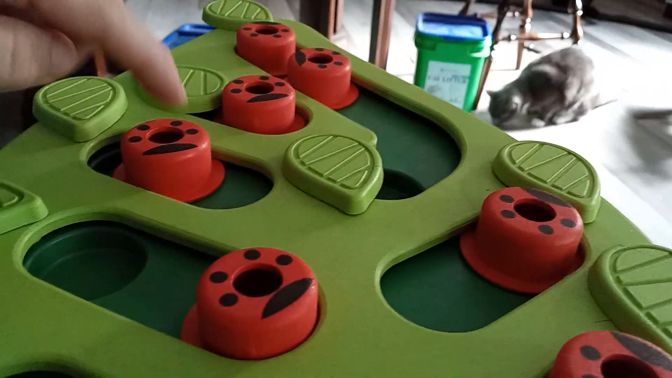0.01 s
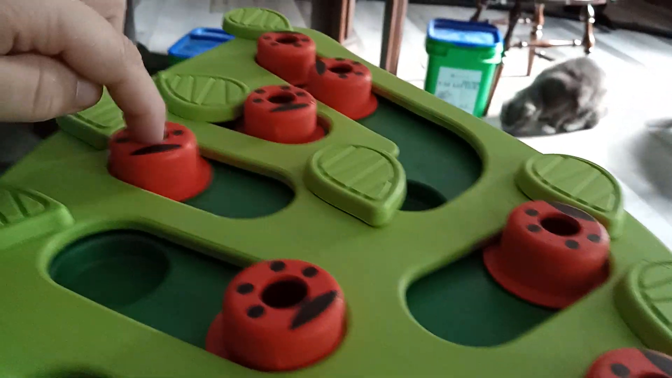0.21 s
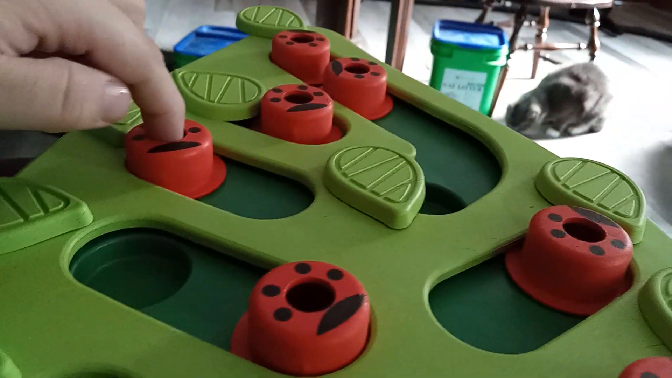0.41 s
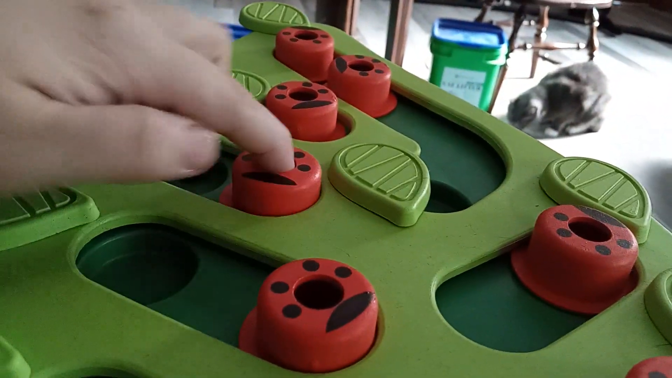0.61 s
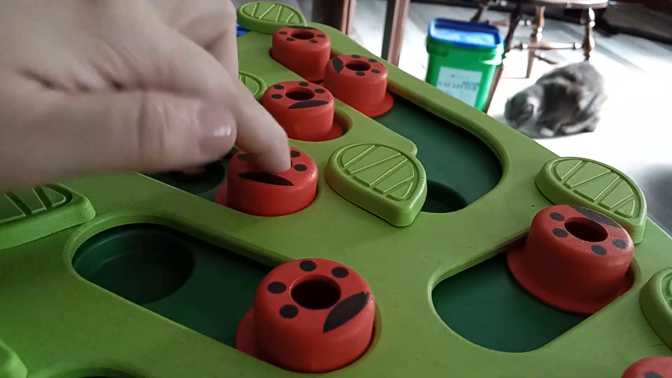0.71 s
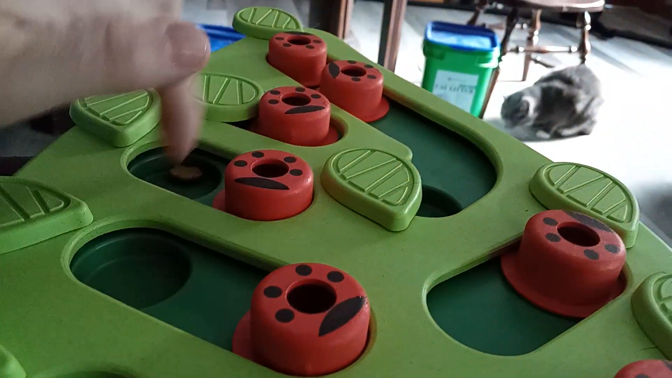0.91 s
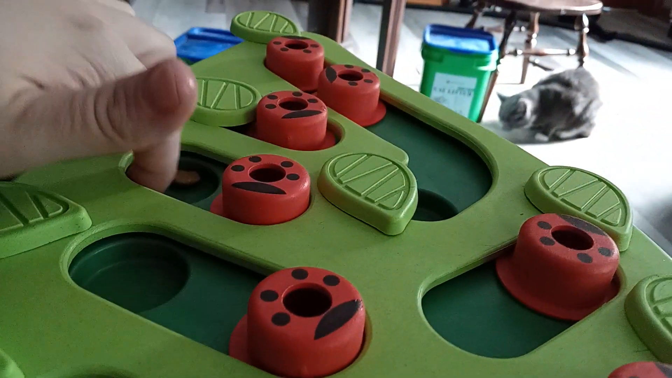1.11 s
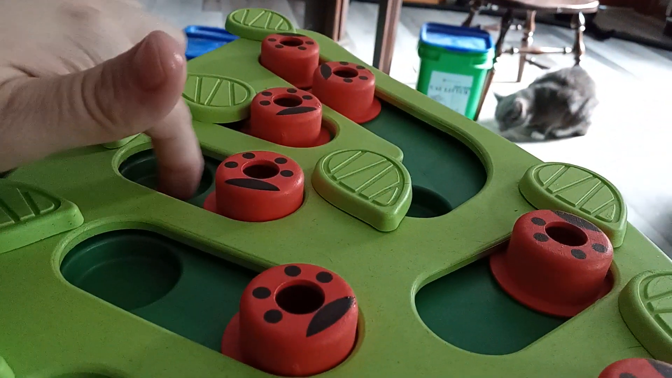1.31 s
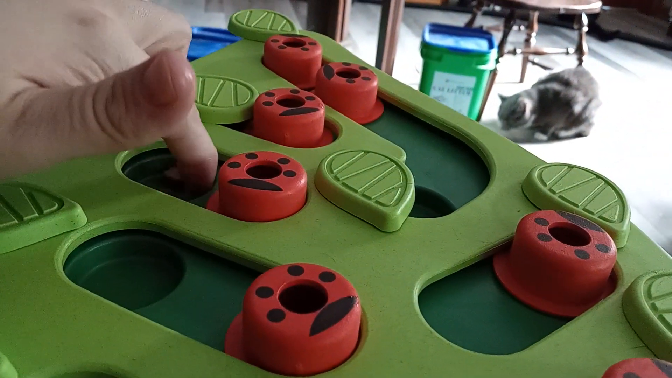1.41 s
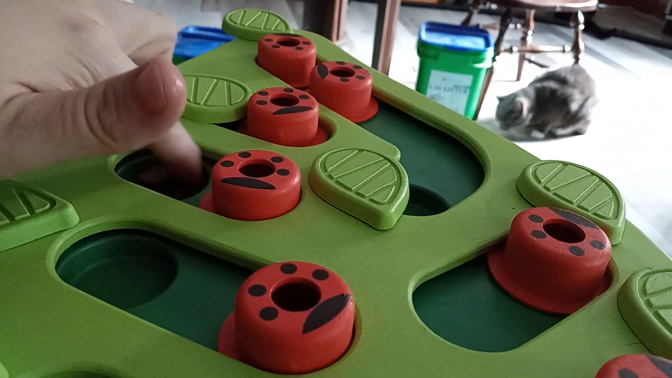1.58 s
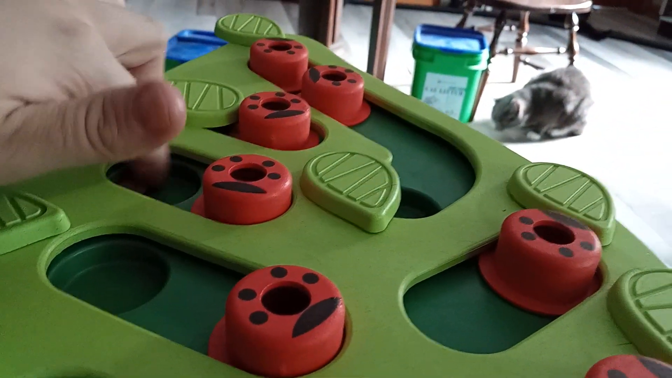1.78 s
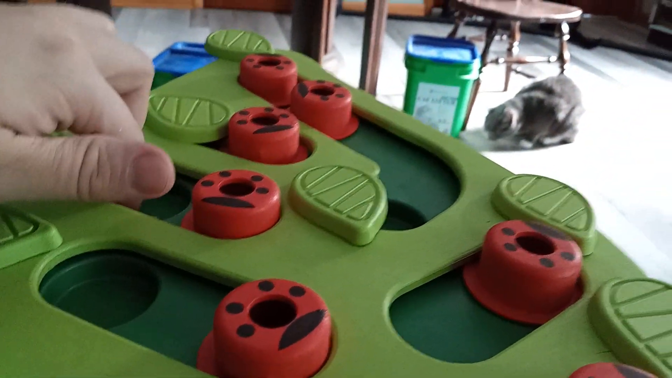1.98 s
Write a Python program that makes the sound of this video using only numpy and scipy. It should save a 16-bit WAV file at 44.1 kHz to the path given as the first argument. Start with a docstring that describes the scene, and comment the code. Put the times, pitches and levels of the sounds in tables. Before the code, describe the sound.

Close up and left of centre, two quick rattling plastic scrapes end in sharp hollow clacks and a brief rattle, followed by a light fingertip knock and faint rubbing, indoors over a quiet electrical hum.

```python
"""A faint electrical hum, rumble and hiss run all through. Close by, a finger pushes a hard plastic cup along its slot
in a hollow plastic puzzle board, there and back: uneven jerks of friction ring the cup, which chatters as it slides.
Short snaps, buzzes and ringing tones make its clacks against the slot's ends and its rattle to rest. The finger then
knocks into the uncovered well and rubs around in it, as soft grainy strokes. A small room answers with a fading tail."""
import sys
import numpy as np
from scipy import signal
from scipy.fft import rfft, irfft, next_fast_len
from scipy.io import wavfile
from scipy.ndimage import map_coordinates

SR = 44100
rng = np.random.default_rng(int(sys.argv[2]) if len(sys.argv) > 2 else 0)


def master(y):
    """Save y as 16-bit WAV."""
    cut = np.clip(np.atleast_2d(y).T, -1, 1)
    pcm = np.round(cut * 32767)  # scale
    wavfile.write(sys.argv[1], SR, pcm.astype(np.int16))


N = 88200  # length of the sound [samples]

# How loud each push of the cup is as it goes along; one list per push: (time [s], level [dB])
SLIDES = [
    [(.237, -58), (.243, -40.5), (.256, -35.5), (.268, -32.5), (.295, -29.5), (.308, -28.5), (.32, -25),
     (.335, -38), (.352, -55)],
    [(.54, -52.5), (.548, -42.5), (.578, -47), (.592, -35), (.626, -34), (.645, -29), (.672, -29),
     (.704, -30.5), (.72, -37), (.735, -60)],
]
# Tone of each push: (bass [dB], treble [dB], strongest resonance [Hz], its lift [dB])
SLIDE_TONES = [(2, -3, 1850, 5), (5, 3, 1250, 3.5)]
# Tone shared by both pushes: (frequency [Hz], level [dB])
SLIDE_COLOUR = [(59, -49), (100, -32), (134, -44), (243, -26.5), (497, -11), (682, -11), (898, -2),
                (1800, -1.5), (2220, -8.5), (2750, -13.5), (3390, -9.5), (4750, -21.5), (6530, -22.5),
                (8230, -39.5), (15500, -37)]
# Tones the cup rings at, also used by its clacks: (frequency [Hz], level [dB], time to fall 60 dB [s])
CUP_MODES = [(237.5, -0.5, 0.037), (793, -2.5, 0.06), (895, 5, 0.022), (1098, 2.5, 0.037),
             (1272, -16, 0.15), (1400, 0.5, 0.062), (1623, 1.5, 0.014), (1830, -0.5, .04),
             (2370, -6.5, 0.068), (2572, 2.5, 0.033), (3500, -6.5, 0.071), (3660, -2, 0.028),
             (5440, 5.5, 0.071), (6450, -2.5, .025)]
SLIPS_PER_S, SLIP_SPREAD_DB, SLIDE_HISS_DB, SLIDE_PAN_DB = 1800, 3, 2.5, 7
SLIDE_TREBLE_HZ = 3200
SLIDE_BRIGHTENS = 0.35  # extra dB of treble per dB of level


def slides(ring_db):
    """The cup chatters along the slot and rings; the louder the scrape, the brighter it is."""
    out = np.zeros((2, N))
    low_pass = signal.butter(3, SLIDE_TREBLE_HZ, fs=SR, output="sos")
    cup_t = np.arange(SR // 16) / SR
    for push, tone in zip(SLIDES, SLIDE_TONES):
        times, levels_db = np.transpose(push)
        i = np.arange(round(times[0] * SR), round(times[-1] * SR))
        level_db = np.interp(i / SR, times, levels_db)
        jerks = friction(len(i), SLIPS_PER_S, SLIP_SPREAD_DB, SLIDE_HISS_DB)
        jerks = chatter(len(i)) * jerks
        rung = signal.fftconvolve(jerks, ring(CUP_MODES, cup_t)[None], axes=1)[:, :len(i)]
        scrape = unit(coloured(jerks + amp(ring_db) * rung, SLIDE_COLOUR, *tone))
        body = signal.sosfiltfilt(low_pass, scrape)
        treble = scrape - body
        treble_gain = amp(SLIDE_BRIGHTENS * (level_db - levels_db.max()))
        out[:, i] += amp(level_db) * (body + treble_gain * treble)
    return pan(SLIDE_PAN_DB) * out


CHATTER_PER_S, CHATTER_FALL_S, CHATTER_DEPTH = 190, 0.0014, 1.1


def chatter(size):
    """The cup catches and lets go at uneven moments; each release is a short spurt of friction."""
    draws = rng.random((200, 2))  # columns: gap, strength
    gaps = (0.5 + draws[:, 0]) / CHATTER_PER_S
    starts = np.r_[0, np.cumsum(gaps)]
    t = np.arange(size) / SR
    latest = np.searchsorted(starts, t, side="right") - 1
    strength = CHATTER_DEPTH * 2 * draws[latest, 1]
    return 1 + strength * np.exp(-2 * (t - starts[latest]) / CHATTER_FALL_S)


def friction(size, per_s, spread_db, hiss_db):
    """Stick and slip: uneven little jerks over a fine hiss."""
    happens = rng.random(size) < per_s / SR
    strength = amp(spread_db * np.clip(rng.standard_normal(size), -2, 2))
    jerks = happens * strength * rng.choice([-1, 1], (2, size))
    return unit(jerks) + amp(hiss_db) * rng.standard_normal((2, size))


# The cup hits the slot: (time [s], level [dB], bass [dB], treble [dB], strongest resonance [Hz],
# its lift [dB], left over right [dB])
CLACKS = [(.2315, -45, 24, 7, 900, -2, 8), (.2367, -33.5, -1.5, 6, 1000, 2.5, 13.5),
          (.2435, -40, 3, 0.5, 232, 10, 5.5), (.3275, -37.5, 4.5, -1, 1800, 11, 10),
          (.3325, -24, -4.5, 11, 2100, 1.5, 3.5), (.3353, -26.5, -16, 10.5, 1900, 7.5, 12.5),
          (.3445, -29.5, 2.5, 8, 2000, 6, 4), (.359, -42.5, 8.5, -5, 276, 9.5, 0),
          (.544, -40.5, -0.5, -16, 886, 23, 12), (.5655, -32, 0, -13, 1300, 9, 13.5),
          (.6305, -28, -0.5, 8.5, 1900, 14.5, 5), (.650, -30, -5, -8.5, 1730, 7, 5.5),
          (.708, -25.5, -7.5, -5.5, 2180, 15, 10), (.723, -29, 8, 6.5, 1100, 14, 7.5),
          (.726, -30.5, 10, 16, 650, 6, 9), (.7915, -47, 1.5, -3, 1200, 8.5, 11),
          (.813, -43.5, -19, -12, 2300, 4, 11.5), (.8743, -25, 4.5, 12, 1200, 11, 10),
          (.8775, -27.5, -5, 12, 1300, 11.5, 12.5), (.8798, -30, -15.5, -5, 2200, 9, 1.5),
          (.8967, -34.5, 8.5, 9, 1600, 4.5, 10.5), (.908, -40.5, -3, -4, 1400, 5.5, 4),
          (.918, -42.5, 0.5, -3, 1100, 5.5, 9), (.926, -44.5, -3, -13.5, 1400, 2, 6.5)]
# Tone shared by all the clacks: (frequency [Hz], level [dB])
CLACK_COLOUR = [(70, -48.5), (160, -12.5), (350, -5.5), (750, -1), (1250, -2), (2200, -1), (3300, -6.5),
                (4400, -17), (6300, -21), (8000, -42), (15000, -48)]


def clacks():
    """The cup clacks against the slot's ends and rattles to rest, ringing its own tones."""
    return contacts(CLACKS, CLACK_COLOUR, CUP_MODES, ring_db=-9.5, buzz_db=4, buzz_t60=0.02)


# The finger knocks in the well: (time [s], level [dB], bass [dB], treble [dB], strongest resonance [Hz],
# its lift [dB], left over right [dB])
KNOCKS = [(1.098, -36, 13, 12.5, 430, 2, 12), (1.1015, -32, -5.5, -1.5, 1390, 10.5, 11),
          (1.1063, -40, -5.5, -6, 430, -5, -0.5), (1.1098, -35, -10.5, -13, 997, 15, 0),
          (1.121, -46.5, 15, 4.5, 1110, -5.5, 6), (1.162, -55, -8, -14.5, 1120, 11.5, 9.5),
          (1.792, -60.5, -4, -20.5, 680, 19, 13)]
# Tone shared by all the knocks: (frequency [Hz], level [dB])
KNOCK_COLOUR = [(60, -15.5), (160, -9.5), (260, 0.5), (430, 8), (560, -1), (750, -0.5), (1030, -2.5),
                (1500, 1), (2400, -4), (4200, -14.5), (5300, -12.5), (7600, -21.5), (15000, -37.5)]
# Tones the well rings at: (frequency [Hz], level [dB], time to fall 60 dB [s])
WELL_MODES = [(311, 5.5, 0.12), (436, -0.5, 0.051), (1020, -3, 0.04), (1356, -0.5, 0.023), (1810, 4, 0.046),
              (5260, 21, 0.026)]


def knocks():
    """The finger knocks into the uncovered well and sets off the well's tones."""
    return contacts(KNOCKS, KNOCK_COLOUR, WELL_MODES, ring_db=-7.5, buzz_db=4.5, buzz_t60=0.023)


def contacts(rows, colour, modes, ring_db, buzz_db, buzz_t60):
    """Each contact is a sharp snap, a short dense buzz of the plastic shell and its ringing tones."""
    out = np.zeros((2, N + SR))
    t = np.arange(SR // 8) / SR
    for start, level_db, *tone, pan_db in rows:
        buzz = rng.standard_normal((2, len(t))) * amp(-60 * t / buzz_t60)
        buzz /= np.linalg.norm(buzz, axis=1, keepdims=True)
        snap = t == 0
        blow = snap + amp(buzz_db) * buzz[0] + amp(ring_db) * ring(modes, t)
        blow /= np.linalg.norm(blow)
        hit = coloured(np.array([blow, buzz[1]]), colour, *tone)
        hit /= np.sqrt(np.mean(hit[:, :SR // 200] ** 2))  # the level is that of the first 5 ms
        out[:, round(start * SR):][:, :len(t)] += amp(level_db) * pan(pan_db) * hit
    return out[:, :N]


def ring(modes, t):
    """Fading tones of unit energy in all, a little different in pitch and level every time."""
    total = np.zeros(len(t))
    for hz, db, t60 in modes:
        loudness = amp(db + rng.normal(0, 2) - 60 * t / t60)
        pitch = hz * (1 + rng.normal(0, 0.008))
        total += loudness * np.sin(2 * np.pi * pitch * t)
    return total / np.linalg.norm(total)


# The fingertip rubs the plastic: (time [s], rise [s], hold [s], release [s], level [dB], bass [dB],
# treble [dB], strongest resonance [Hz], left over right [dB])
RUBS = [(0.975, 0.013, .02, .05, -74.5, -8, 18.5, 6050, 0),
        (1.108, 0.0044, 0.034, 0.045, -54, 19, -16, 920, 12),
        (1.201, .025, .04, 0.12, -79.5, -5, 4.5, 3480, 8.5),
        (1.309, 0.028, 0.0064, 0.027, -52, -12, 13.5, 1460, 13.5),
        (1.453, 0.032, 0.0057, 0.12, -82.5, 5, 9, 1960, 17),
        (1.576, 0.013, 0.0278, 0.077, -62, -10.5, -13.5, 2830, 9),
        (1.658, 0.023, 0.025, .05, -58, -4.5, -12.5, 2330, 8),
        (1.793, 0.00605, 0.077, 0.027, -61, 11.5, -7, 1830, 12.5),
        (1.856, 0.04, .065, 0.17, -56.5, 8, 2, 966, 14.5)]
# Tone shared by all the rubs: (frequency [Hz], level [dB])
RUB_COLOUR = [(150, -23.5), (550, -20.5), (850, -5), (1400, -6), (1830, 2), (2200, -8), (2750, -13),
              (3500, -8), (4600, -20), (5200, -5.5), (5800, -9), (6400, -17), (7900, -25.5), (9600, -21),
              (13000, -29.5), (15200, -20)]
RUB_GRAINS_PER_S, RUB_SPREAD_DB, RUB_HISS_DB = 2700, 5.5, -1.5


def rubs(rise_db, release_db, focus_db):
    """Soft grainy strokes of the fingertip that swell, hold and fade."""
    out = np.zeros((2, N + SR))
    t = np.arange(SR // 3) / SR
    for start, rise, hold, release, level_db, *tone, pan_db in RUBS:
        swell_db = -rise_db * np.maximum(1 - t / rise, 0)
        fade_db = -release_db * np.maximum(t - rise - hold, 0) / release
        grains = friction(len(t), RUB_GRAINS_PER_S, RUB_SPREAD_DB, RUB_HISS_DB)
        stroke = unit(coloured(grains, RUB_COLOUR, *tone, focus_db))
        loudness = amp(level_db + swell_db + fade_db)
        out[:, round(start * SR):][:, :len(t)] += loudness * pan(pan_db) * stroke
    return out[:, :N]


# Extra level of left over right at each pitch: (frequency [Hz], level difference [dB])
SHADOW = [(150, -6), (300, -11), (600, -0.5), (1100, 0), (2200, 0.5), (4200, -2), (8500, 3)]
LEFT_LEAD_S = 0.00006


def ports(x):
    """The board lies to the left: sound gets there sooner, and the balance of the sides varies with pitch."""
    m = next_fast_len(N + SR // 2)
    hz = np.fft.rfftfreq(m, 1 / SR)
    # each side takes half the difference in level and time
    left = amp(along(SHADOW, hz) / 2) * np.exp(1j * np.pi * hz * LEFT_LEAD_S)
    return irfft(rfft(x, m) * np.array([left, 1 / left]), m)[:, :N]


# How long the room rings on: (frequency [Hz], time to fall 60 dB [s])
ROOM = [(150, 0.17), (600, .36), (1500, 0.34), (4000, 0.37), (7000, 0.25), (12000, .18)]
ROOM_DB, ROOM_DELAY_S, ROOM_PAN_DB = -17, 0.0068, 3


def room(x):
    """The room's tail is fading noise; each frequency dies at its own speed."""
    hz, t, noise = signal.stft(rng.standard_normal((2, SR // 2)), SR, nperseg=256)
    fade = amp(-60 * t / along(ROOM, hz)[:, None])
    tail = signal.istft(noise * fade, SR, nperseg=256)[1]
    tail /= np.linalg.norm(tail[0])
    tail = np.pad(tail, ((0, 0), (round(ROOM_DELAY_S * SR), 0)))
    answer = signal.fftconvolve(x.mean(0)[None], tail, axes=1)[:, :N]
    return amp(ROOM_DB) * pan(ROOM_PAN_DB) * answer


# Tone of the faint hiss: (frequency [Hz], level [dB])
FLOOR_COLOUR = [(70, -25.5), (130, -8), (300, -9.5), (600, -19), (1200, -23.5), (3000, -28.5),
                (6500, -30.5), (9000, -45), (15500, -41)]
# Tone of the low rumble: (frequency [Hz], level [dB])
RUMBLE_COLOUR = [(20, -12), (40, -16.5), (58, 0), (100, 4.5), (160, -23), (400, -37)]
FLOOR_DB, RUMBLE_DB = -77.5, -74.5
HUM_HZ, HUM_DB, HUM_PAN_DB, HUM_WAVER_DB = 87.6, -64.5, -3, 0.7


def background(wavers_per_s):
    """A slightly wavering electrical hum, a pure tone, over the room's faint rumble and hiss of noise."""
    t = np.arange(N) / SR
    waver = map_coordinates(rng.standard_normal(size=100), [t * wavers_per_s])  # smooth random curve
    tone = np.sqrt(2) * np.sin(2 * np.pi * HUM_HZ * t)
    hum = amp(HUM_DB + HUM_WAVER_DB * waver) * tone
    hiss = unit(coloured(rng.standard_normal((2, N)), FLOOR_COLOUR))
    rumble = unit(coloured(rng.standard_normal((2, N)), RUMBLE_COLOUR))
    return pan(HUM_PAN_DB) * hum + amp(FLOOR_DB) * hiss + amp(RUMBLE_DB) * rumble


# How alike left and right are, 1 being the same: (frequency [Hz], likeness [0 to 1])
ALIKE = [(100, 0.85), (550, 0.54), (1000, 0.51), (2000, .6), (5000, 0.1), (12000, 0.12)]
FOCUS_OCTAVES = 0.27  # half width of the resonance


def coloured(pair, colour, bass_db=0, treble_db=0, focus_hz=1000, focus_db=0):
    """Two signals become left and right, through a tone curve with bass, treble and one resonance."""
    n = pair.shape[1]
    m = 2 * next_fast_len(n // 2 + 2048)
    hz = np.fft.rfftfreq(m, 1 / SR)
    bass = bass_db / (1 + (hz / 500) ** 2)
    treble = treble_db * hz ** 2 / (hz ** 2 + 3200 ** 2)
    octaves_away = np.log2((hz + 1) / focus_hz)
    focus = focus_db / (1 + (octaves_away / FOCUS_OCTAVES) ** 2)
    db = along(colour, hz) + bass + treble + focus
    # folding the cepstrum makes a filter that never sounds before its input
    cepstrum = irfft(np.log(amp(db)))[:m // 2]
    response = np.exp(rfft(np.r_[cepstrum[0], 2 * cepstrum[1:]], m))
    turn = np.arccos(np.clip(along(ALIKE, hz), -1, 1)) / 2
    mid, side = rfft(pair, m) * response * [np.cos(turn), np.sin(turn)]
    return irfft(np.array([mid + side, mid - side]), m)[:, :n]


def along(points, hz):
    """Read a table of (frequency, value) points on a log frequency axis."""
    f, v = np.transpose(points)
    return np.interp(np.log(hz + 1), np.log(f + 1), v)


def pan(db):
    """Left and right gains for a level difference; above 0 the left is louder."""
    return amp(np.array([[db], [-db]]) / 2)


def amp(db):
    """Decibels to gain."""
    return 10 ** (np.asarray(db) / 20)


def unit(x):
    """Scale to an average (rms) level of 1."""
    return x / np.sqrt(np.mean(x ** 2) + 1e-20)


def scene():
    """Cup and finger on the board, in the room, over the background."""
    cup = slides(ring_db=-15) + clacks()
    finger = knocks() + rubs(rise_db=21, release_db=30.5, focus_db=6.5)
    board = cup + finger
    return ports(board) + room(board) + background(wavers_per_s=14)


TOP_HZ = 15900


def record(dry):
    """The recorder keeps nothing at or above its band limit."""
    m = next_fast_len(N + SR // 2)
    kept = np.fft.rfftfreq(m, 1 / SR) < TOP_HZ
    return irfft(rfft(dry, m) * kept, m)[:, :N]


dry = scene()
out = record(dry)
master(out)
```